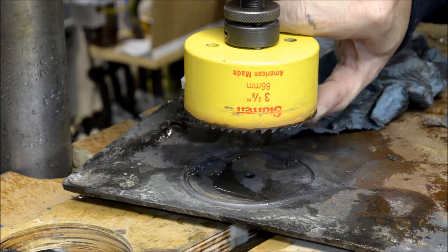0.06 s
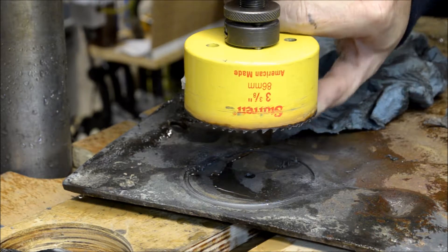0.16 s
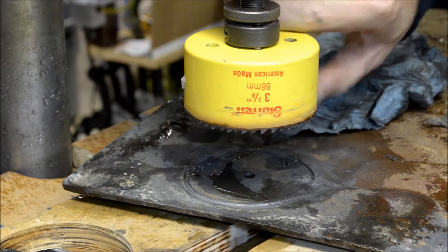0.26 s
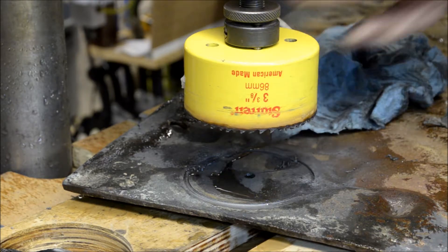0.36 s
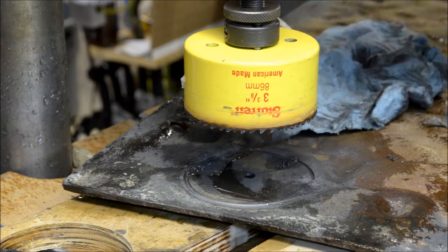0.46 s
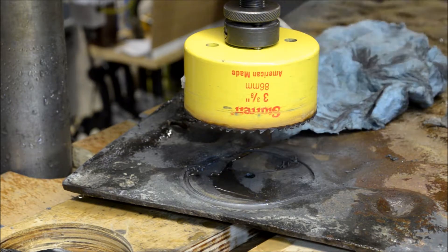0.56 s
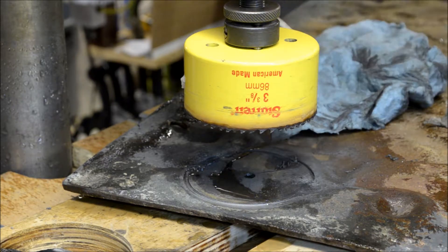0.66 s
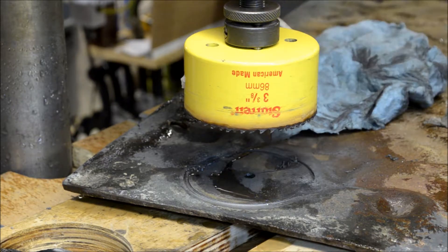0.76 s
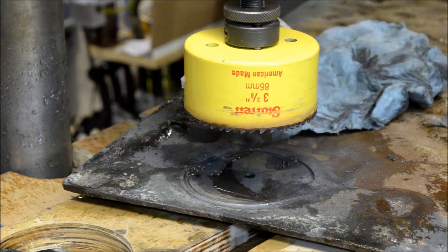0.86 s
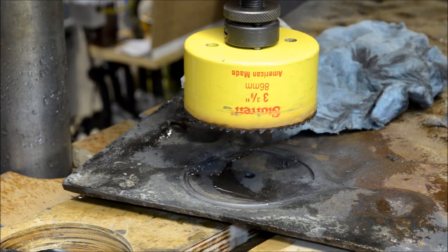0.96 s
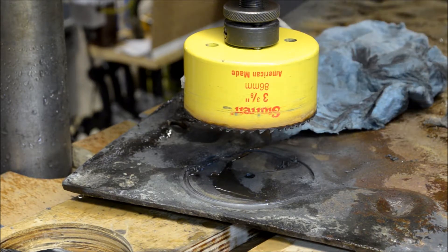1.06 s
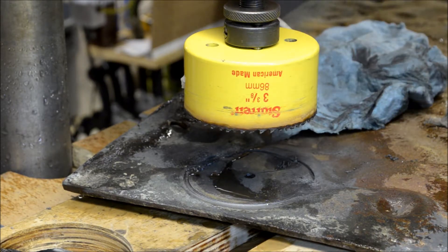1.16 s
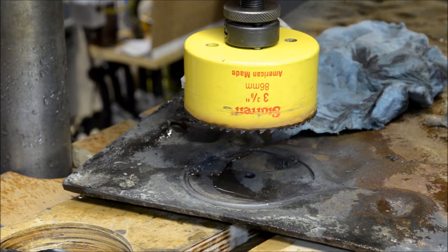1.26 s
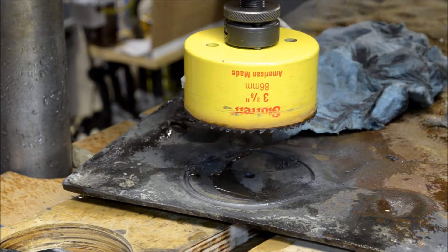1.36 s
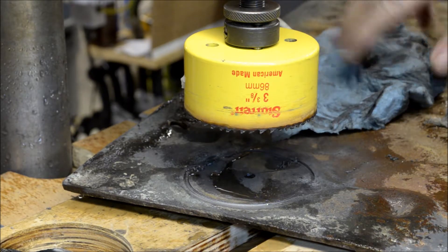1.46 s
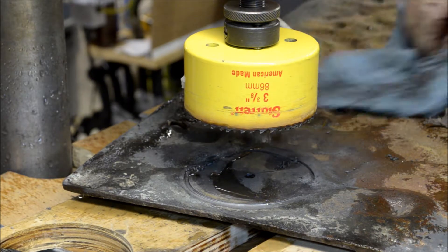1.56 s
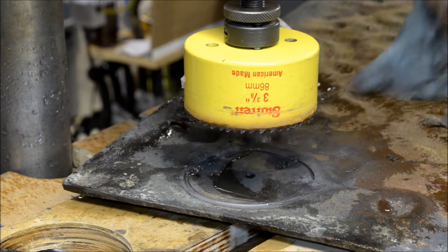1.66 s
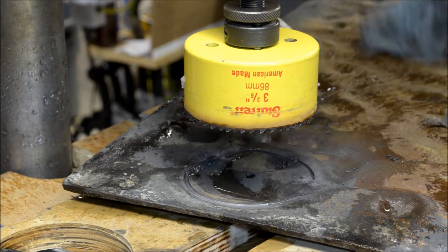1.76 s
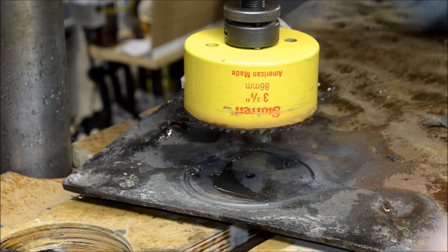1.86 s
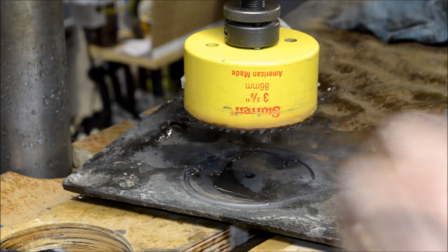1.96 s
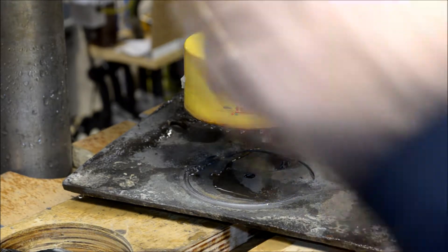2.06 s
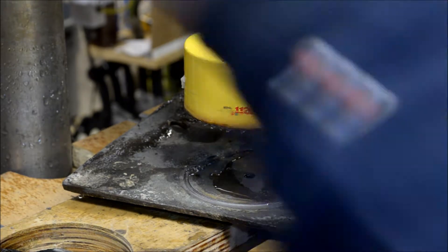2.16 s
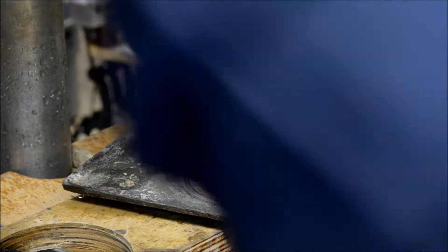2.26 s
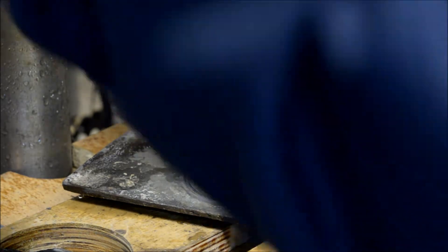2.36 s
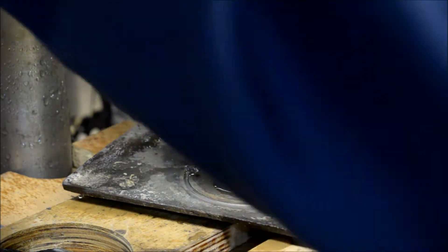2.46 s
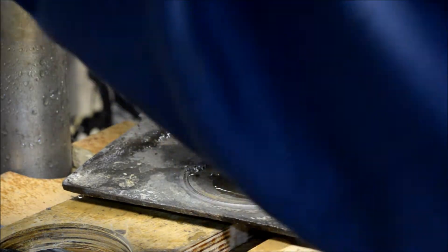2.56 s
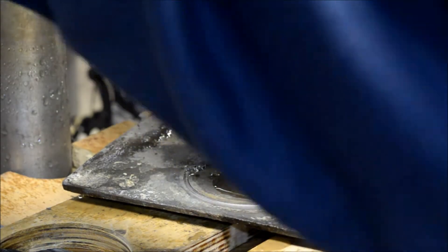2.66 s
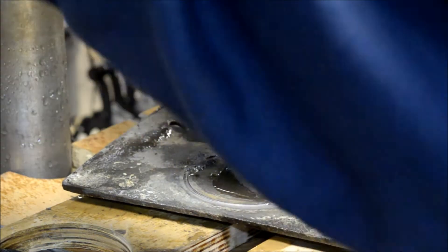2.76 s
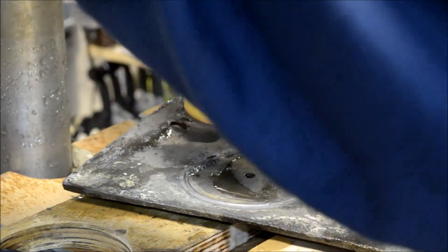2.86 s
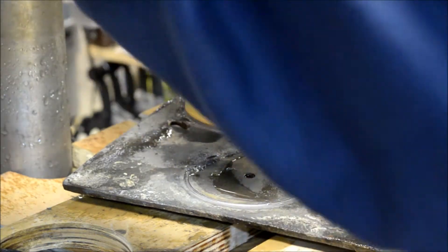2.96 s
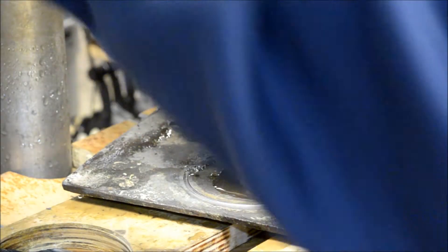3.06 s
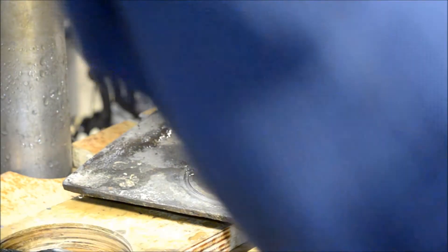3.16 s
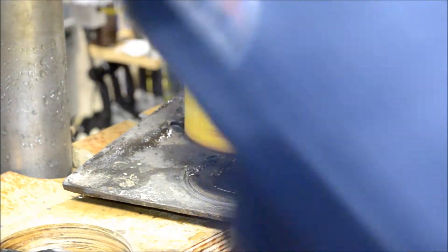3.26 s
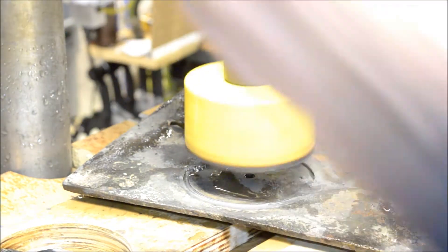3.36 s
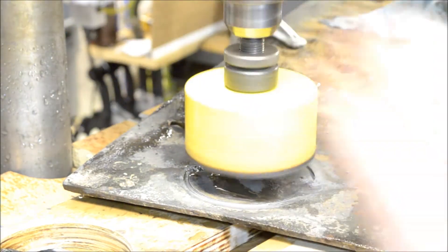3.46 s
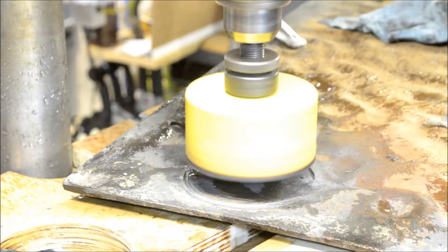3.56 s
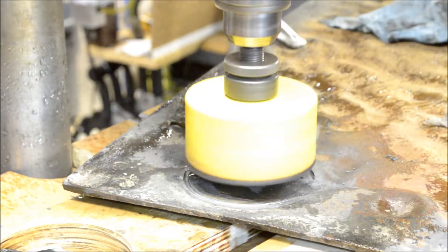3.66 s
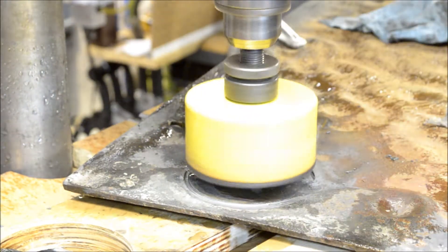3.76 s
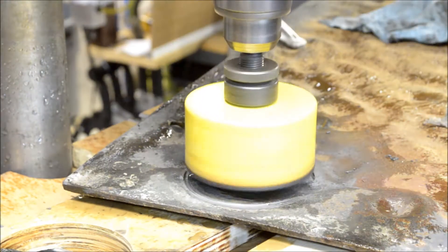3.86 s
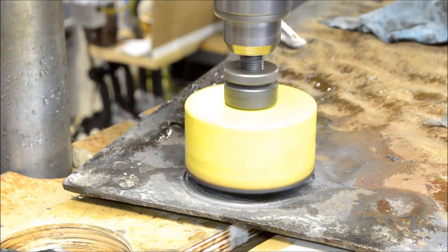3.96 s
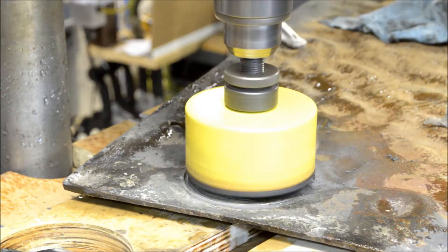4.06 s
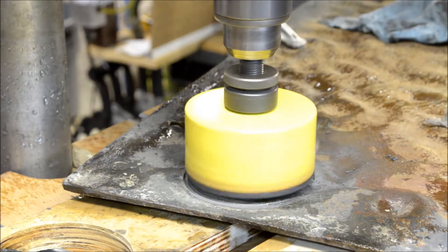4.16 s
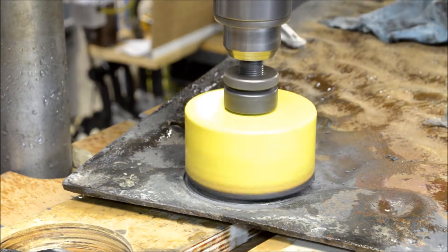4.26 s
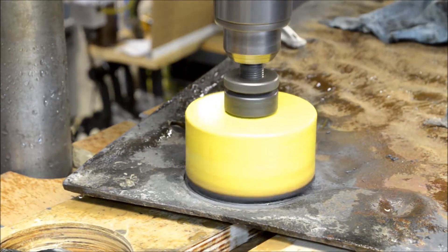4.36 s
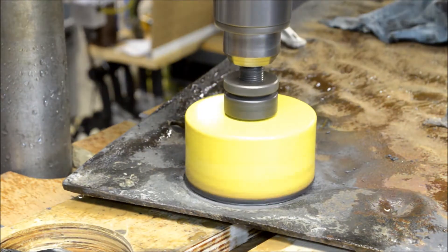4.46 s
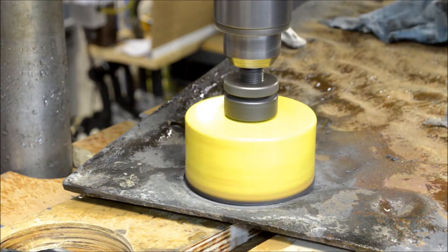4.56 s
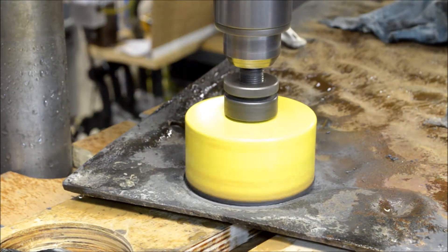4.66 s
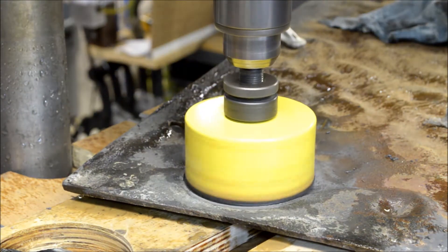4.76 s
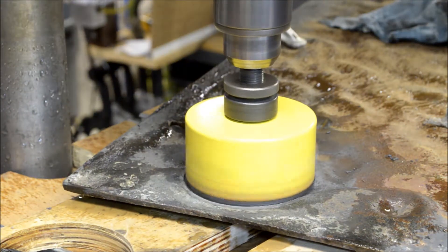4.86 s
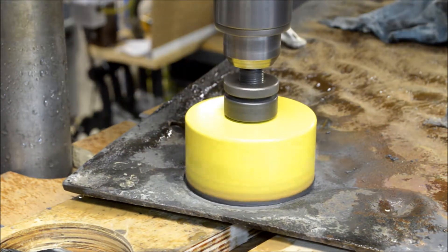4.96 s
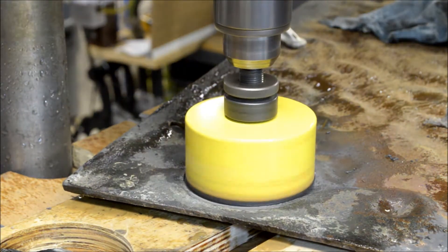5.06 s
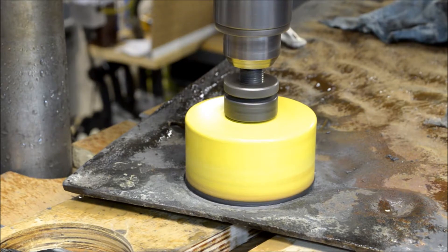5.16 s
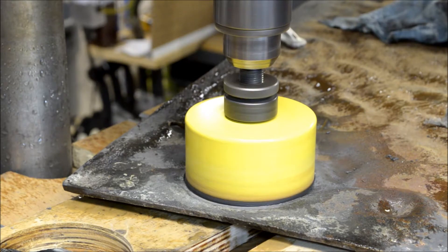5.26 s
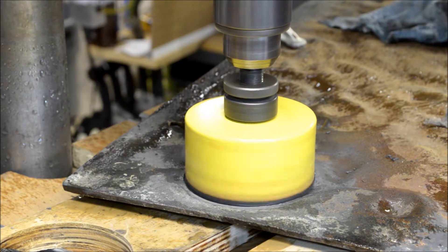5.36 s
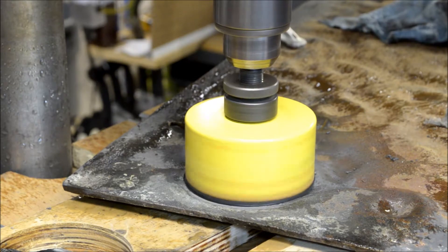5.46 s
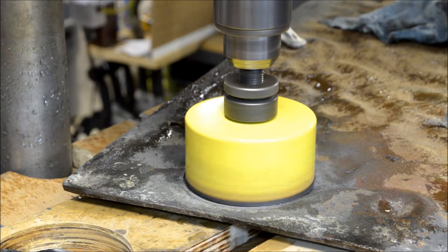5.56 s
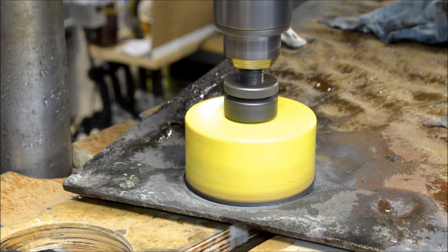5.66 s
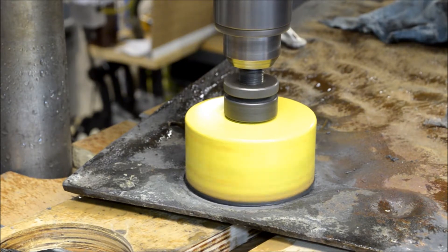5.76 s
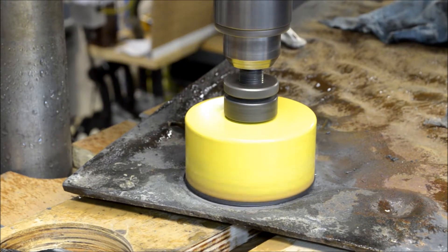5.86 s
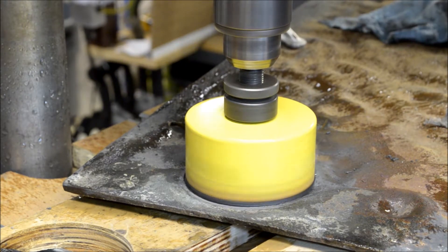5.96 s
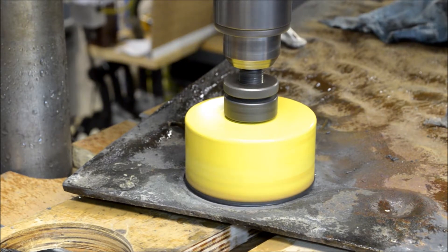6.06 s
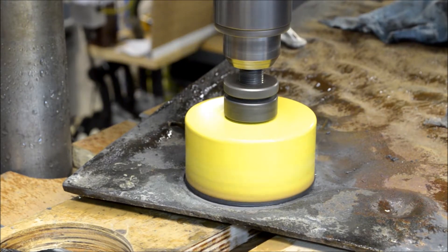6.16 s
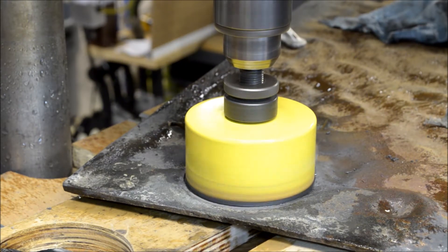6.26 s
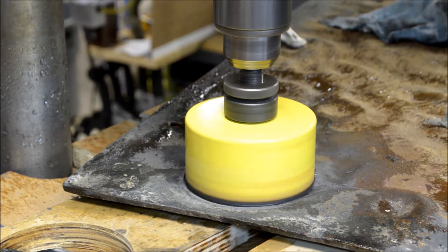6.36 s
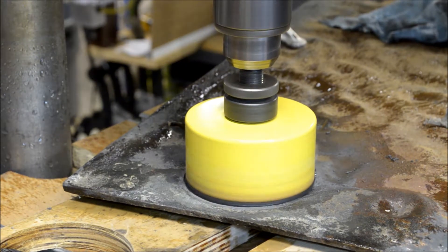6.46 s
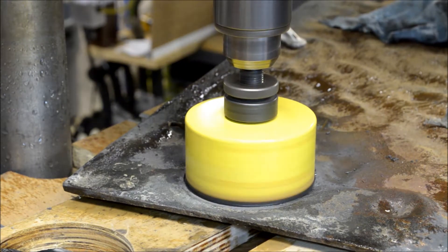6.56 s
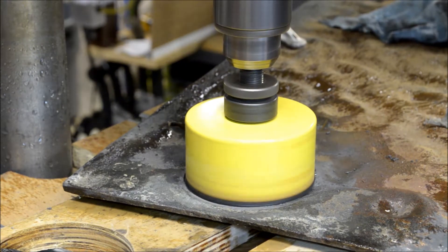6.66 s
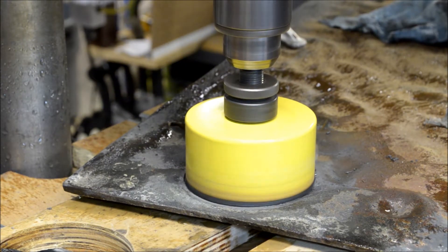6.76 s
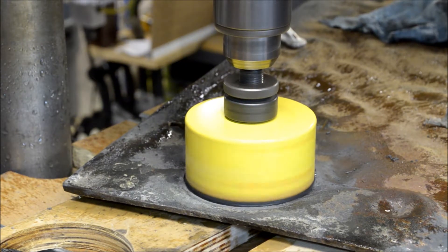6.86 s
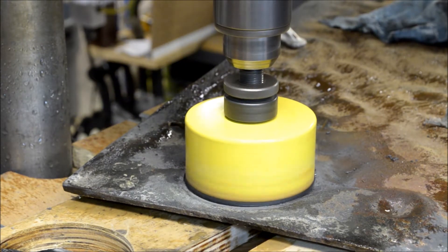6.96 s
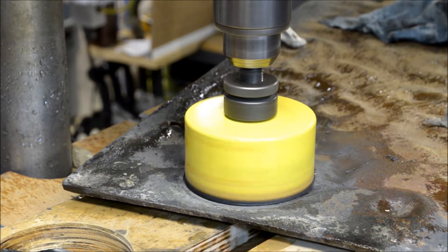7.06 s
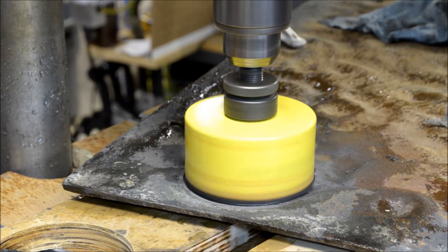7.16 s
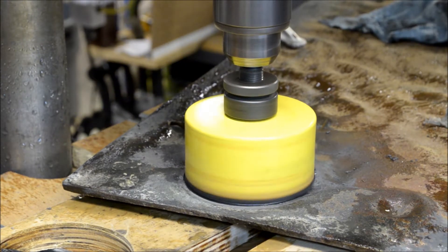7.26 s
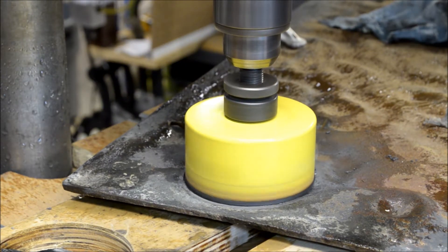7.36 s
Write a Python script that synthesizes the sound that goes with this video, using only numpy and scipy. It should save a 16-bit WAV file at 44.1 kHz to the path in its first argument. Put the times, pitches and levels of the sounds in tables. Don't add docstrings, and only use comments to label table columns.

```python
import sys
import numpy as np
from scipy import signal
from scipy.fft import rfft, irfft
from scipy.io import wavfile
from scipy.ndimage import uniform_filter1d, map_coordinates

SR = 44100
rng = np.random.default_rng(int(sys.argv[2]) if len(sys.argv) > 2 else 0)


def amplitude_ratio(level_db):
    exponent = np.asarray(level_db, float) / 20
    return 10 ** exponent


def transcribe(signal):
    frames = np.atleast_2d(signal).T
    limited = np.clip(frames, -1, 1)
    pcm = np.round(limited * 32767).astype(np.int16)
    wavfile.write(sys.argv[1], SR, pcm)


N = 326340


def unit(x):
    return x / np.sqrt(np.mean(x ** 2) + 1e-20)


def along(points, hz):
    f, v = np.transpose(points)
    return np.interp(np.log(hz + 1), np.log(f + 1), v)


def curves(rows, off=-120):
    s, *cols = np.transpose(rows)
    return [np.interp(np.arange(N) / SR, s, c, left=off) for c in cols]


def wobble(rate):
    return map_coordinates(rng.standard_normal(int(N * rate / SR) + 4), [np.arange(N) * rate / SR])


def below(f, hz, power):
    return 1 / (1 + (f / hz) ** power)


def above(f, hz, power):
    return 1 / (1 + (hz / (f + 1)) ** power)


def bell(f, centre, width):
    return 1 / (1 + (2 * (f - centre) / width) ** 2)


def causal(x, gain, size=16384):
    ceps = irfft(np.log(gain(np.fft.rfftfreq(size, 1 / SR)) + 1e-6), size)
    ceps[1:size // 2] *= 2
    ceps[size // 2 + 1:] = 0
    response = irfft(np.exp(rfft(ceps)), size)
    return signal.fftconvolve(x, response.reshape(np.shape(x)[:-1] + (size,)), axes=-1)[..., :N]


def body(broad, modes=(), broad_db=0):
    def shape(f):
        clear = sum(amplitude_ratio(2 * db) * bell(f, c, w) ** 2 for c, w, db in modes)
        return np.sqrt(amplitude_ratio(2 * (along(broad, f) + broad_db)) + clear)
    norm = np.sqrt(np.mean(shape(np.linspace(0, SR / 2, 8000)) ** 2))
    return lambda f: shape(f) / norm


def bursts(rows, favour=0):
    t, hz, out = np.arange(SR // 2) / SR, np.fft.rfftfreq(SR // 2, 1 / SR), np.zeros(N + SR)
    for s, db, rise, t60, *centre in rows:
        env = amplitude_ratio(db - 60 * np.maximum(t - rise, 0) / max(t60, .005)) * np.clip(t / max(rise, 1e-4), 0, 1)
        c = centre[0] if centre else 1000
        peak = 1 + favour * .2j * hz * c / (c * c - hz * hz + .2j * hz * c)
        noise = env * rng.standard_normal(len(t))
        out[round(s * SR):][:len(t)] += irfft(rfft(noise) * peak, len(t))
    return out[:N]


def strokes(rows):
    t = np.arange(N) / SR
    return sum(amplitude_ratio(db - 20 * np.maximum((s - t) / rise, (t - s) / fall)) for s, db, rise, fall in rows)


def grit(lumps_db, rate):
    return unit(amplitude_ratio(lumps_db * wobble(rate)) * rng.standard_normal(N))


def shifting(x, depth_db, bins, frames):
    z = signal.stft(x, nperseg=512)[2]
    field = uniform_filter1d(uniform_filter1d(rng.standard_normal(z.shape), bins, 0), frames, 1)
    return signal.istft(z * amplitude_ratio(depth_db * unit(field)), nperseg=512)[1][:N]


def snaps(rows):
    t60_at_1khz, damping = .075, 0.35
    out, t = np.zeros(N + SR), np.arange(SR // 8) / SR
    for s, db, hz in rows:
        ring = np.sin(2 * np.pi * hz * t + np.cumsum(rng.normal(0, 0.13, len(t))))
        band = signal.butter(3, [1.7 * hz / SR, 2.2 * hz / SR], 'band')
        crack = 1.6 * signal.lfilter(*band, rng.standard_normal(len(t)))
        fade = amplitude_ratio(db - 1.5 - 60 * t / t60_at_1khz * (hz / 1000) ** damping)
        out[round(s * SR):][:len(t)] += fade * (ring + crack)
    return out[:N]


# (f/Hz, t60/s)
ECHO = [(200, 0.49), (2000, 0.27), (10000, 0.33)]


def shop(x):
    hz, t, z = signal.stft(rng.standard_normal(SR // 2), SR, nperseg=256)
    tail = signal.istft(z * amplitude_ratio(-60 * t / along(ECHO, hz)[:, None]), SR, nperseg=256)[1]
    return signal.fftconvolve(np.pad(x, (300, 0)), tail / np.linalg.norm(tail))[:N]


# (f/Hz, level/dB per Hz)
ROOM_TONE = [(150, -38), (250, -8), (420, 3.5), (570, -1), (1000, -5), (1800, -7), (3300, -12.5),
             (8000, -24), (11000, -25), (15000, -40)]
# (f/Hz, level/dB)
HUMS = [(59.2, -77.5), (527.6, -72.5), (839.8, -84.5), (1798, -82.5)]
# (f/Hz, level/dB per Hz)
RUMBLE_COLOUR = [(12, -40), (25, -14), (45, 0), (87, -3.5), (120, -6), (240, -0.5), (330, -7), (600, -69)]
# (peak t/s, level/dB, 20 dB rise/s, 20 dB fall/s)
RUMBLE_SWELL = [
    (1.05, -75.5, 1.2, 2),
]


def room_tone():
    t = np.arange(N) / SR
    hum = sum(1.4 * amplitude_ratio(db + .8 * wobble(6)) * np.sin(2 * np.pi * hz * t + .4 * wobble(5)) for hz, db in HUMS)
    rumble = (amplitude_ratio(-75) + strokes(RUMBLE_SWELL)) * causal(rng.standard_normal(N), body(RUMBLE_COLOUR))
    air = amplitude_ratio(-69 + 1.2 * wobble(2.6)) * causal(rng.standard_normal(N), body(ROOM_TONE))
    return hum + rumble + air


# (t/s, f/Hz)
SQUEAK = [
    (.78, 4930),
    (.84, 4550),
    (.87, 4050),
    (.95, 3950),
]
# (peak t/s, level/dB, 20 dB rise/s, 20 dB fall/s)
SQUEAK_SWELLS = [
    (.8, -75, .12, .1),
    (.875, -56, .03, .09),
]


def squeak():
    hz, = curves(SQUEAK, off=SQUEAK[0][1])
    tone = np.sin(2 * np.pi * np.cumsum(hz + 150 * wobble(400)) / SR)
    return strokes(SQUEAK_SWELLS) * amplitude_ratio(3 * wobble(150)) * tone


# (peak t/s, level/dB, 20 dB rise/s, 20 dB fall/s)
CLOTH = [
    (.71, -61.5, .25, .3),
    (.87, -49, .03, 0.09),
    (1.6, -65.5, .16, 0.15),
    (2.46, -66, 1.5, .3),
    (2.7, -60.5, 0.3, 0.2),
]
# (f/Hz, level/dB per Hz)
WEAVE = [(500, -25), (900, -5), (2600, -7), (4000, -8.5), (5700, -11.5), (7900, -12), (10500, -19.5),
         (13000, -38), (15000, -55)]


def cloth():
    ruffles = [(s, db - 40, .015, 0.1) for s, db, thud, hz in KNOCKS]
    return strokes(CLOTH + ruffles) * causal(grit(lumps_db=1.5, rate=370), body(WEAVE))


# (t/s, level/dB, f/Hz)
TICKS = [(0.257, -66, 9200), (0.257, -59, 5000), (1.345, -72, 3380), (1.7469, -57, 8090),
         (1.8023, -62, 7410), (1.84, -59, 8000), (2.49, -47, 2600), (2.517, -47, 3500), (2.519, -50, 4600),
         (2.525, -50, 2500), (2.62, -58, 2450), (2.635, -57, 2400), (2.65, -56, 2450), (2.655, -58, 900)]


def fibres():
    return snaps(TICKS)


# (t/s, level/dB, thud level/dB, favoured f/Hz)
KNOCKS = [(0.139, -39.5, -17, 755), (0.256, -35, -13, 1060), (0.475, -55, -19, 2160),
          (0.835, -38.5, -11, 1230), (1.013, -35, -12, 1340), (1.043, -31, -9, 850), (1.17, -31.5, -9, 780),
          (1.234, -37, -4.5, 1310), (1.252, -37, -4, 853), (1.345, -33.5, -10, 865),
          (2.489, -29.5, -19.5, 1310), (2.516, -29, -10, 840)]
# (f/Hz, width/Hz, level/dB)
BENCH = [(400, 50, -3), (458, 35, 0), (786, 50, 3), (915, 45, -3), (1015, 25, -4), (1195, 40, -6),
         (1314, 50, -1), (1421, 30, -7), (1640, 35, -8), (1739, 35, -8), (2099, 40, -10), (2320, 45, -11),
         (3560, 80, -20)]
# (f/Hz, level/dB per Hz)
BENCH_BROAD = [(71, -65), (120, -33), (390, 0), (498, 0.5), (856, 0), (3550, -21), (6000, -33), (7800, -68),
               (13200, -120)]
# (t/s, level/dB, rise/s, t60/s)
SCUFF = [
    (.862, -53, 0.016, .16),
]
# (t/s, level/dB, rise/s, t60/s, f/Hz)
CREAK = [
    (3.2, -46, .06, 0.22, 2400),
    (2.8, -58, .03, .3, 1400),
    (3.1, -44, .03, .25, 470),
    (0.74, -53, 0.0092, 0.25, 1400),
]


def bench():
    timber = body(BENCH_BROAD, BENCH, broad_db=-5.5)
    knocks = bursts([(s, db - 6.5, .0008, 0.115, hz) for s, db, thud, hz in KNOCKS], favour=0.98)
    wood = causal(knocks, lambda f: timber(f) * above(f, 600, 6))
    thuds = bursts([(s, db + thud, .004, 0.26) for s, db, thud, hz in KNOCKS])
    thuds = causal(thuds, lambda f: timber(f) * below(f, 600, 6))
    hard = [(1200, -26), (2400, 11), (2900, -12), (3500, 3), (4800, -12), (9000, -49)]
    edge = causal(bursts([(s, db - 27, .001, 0.12) for s, db, thud, hz in KNOCKS]), body(hard))
    boards = [(60, -36), (150, 5), (260, 3), (600, -40)]
    creak = causal(bursts(CREAK, favour=17) / 7, lambda f: below(f, 3500, 4))
    return creak + wood + thuds + edge + causal(bursts(SCUFF), body(boards))


# (t/s, level/dB, f/Hz)
SWITCH = [(2.82, -54, 3250), (2.821, -55, 9000), (2.821, -52, 10000), (2.821, -55, 5200),
          (2.8497, -21, 3590), (2.85, -26, 10000), (2.85, -29, 8300), (2.85, -31, 6300), (2.854, -27, 7600),
          (2.855, -28, 10300), (2.869, -15.5, 1340), (2.874, -20, 1100), (2.8699, -26, 6510),
          (2.902, -32, 9100), (2.995, -32, 6500), (2.995, -41, 11000), (3.007, -24, 7350),
          (3.007, -36, 11500), (3.031, -38, 11500)]


def switch():
    return snaps(SWITCH)


def strain():
    t = np.arange(N) / SR
    start_s, attack_s, release_s = 2.872, 0.009, 0.055
    held = amplitude_ratio(-20 * np.maximum(0, np.maximum((start_s - t) / attack_s, (t - UP_S) / release_s)))
    throat = [(300, -46), (620, -8), (790, 9), (900, -4), (1200, -35), (2000, -60)]
    growl = causal(grit(lumps_db=-3.5, rate=130), body(throat))
    growl = strokes([(start_s + 0.071, -28, .05, .16)]) * growl
    hum = np.sin(2 * np.pi * np.cumsum(246 + 3.4 * wobble(20)) / SR)
    return held * (amplitude_ratio(-24.5 + 1.9 * wobble(24.7)) * hum + growl)


def ducking():
    return np.minimum(uniform_filter1d(curves(MOTOR, off=RUN_DB)[0], SR // 8) - RUN_DB, 0)


RUN_DB, UP_S = -34, 3.03
# (t/s, level/dB)
MOTOR = [(2.852, -45), (2.875, -26.5), (2.94, -24.5), (3.055, -24), (3.09, -33.5), (3.74, -34.5),
         (3.79, -29.5), (4.42, -32), (4.62, -31), (4.81, -35.5), (4.87, -47), (7.15, -42), (7.3, -30),
         (7.4, -34)]
# (f/Hz, width/Hz, level/dB)
CASING = [(249, 25, -3), (394, 40, -2), (445, 42, -2), (824, 180, -3), (1310, 86, -5.5), (1740, 23, -7.5),
          (2237, 55, -10.5), (3200, 200, -13.5), (5200, 200, -20), (6400, 250, -20), (9000, 400, -25.5)]
# (f/Hz, level/dB per Hz)
CASING_BROAD = [(150, -60), (215, -30), (240, 2), (310, -13.5), (420, -7.5), (850, -4), (3200, -15),
                (6400, -20), (9000, -27.5), (12000, -42.5), (15000, -58)]
# (multiple, level under casing/dB)
SHAFT = [(8, -19), (11, -9.5), (12, -13), (13, -4), (15, -17), (16, -21), (20, -17), (26, -18)]
# (peak t/s, level/dB, 20 dB rise/s, 20 dB fall/s)
JOLT = [
    (2.87, -22, 0.016, 0.0646),
    (3.015, -33.5, 0.0629, 0.03),
]


def motor():
    t = np.arange(N) / SR
    level_db, = curves(MOTOR)
    running = level_db > -99
    casing_db = level_db + .7 * wobble(14)
    whir = amplitude_ratio(-31.5 + 0.76 * (level_db - RUN_DB) + 0.3 * wobble(20)) * running + strokes(JOLT)
    turns = np.cumsum(29.89 * (1 + 0.0027 * wobble(3.3))) / SR
    orders = sum(amplitude_ratio(db - 2 + 1.8 * wobble(11)) * np.sin(2 * np.pi * k * turns + 6 * k) for k, db in SHAFT)
    rattle = causal(grit(lumps_db=1.2, rate=90), body(CASING_BROAD, CASING, broad_db=-2))
    low = causal(rattle, lambda f: below(f, 700, 4))
    run_up_db = -20 * np.clip((UP_S - t) / .4, 0, 1)
    kick_db = 6 * np.exp(-((t - UP_S) / .06) ** 2)
    column_db = -61 + run_up_db + kick_db + 1.04 * ducking() + 2.1 * wobble(10)
    column_gain = uniform_filter1d(amplitude_ratio(np.where(running, column_db, -120)), SR // 10)
    iron = [(20, -60), (45, -33), (65, -12), (92, -8), (120, 6.5), (170, -6), (230, -34), (400, -59)]
    column = column_gain * causal(rng.standard_normal(N), body(iron))
    return amplitude_ratio(casing_db) * (orders + 0.78 * unit(low)) + whir * unit(rattle - low) + column


# (t/s, level/dB, favoured f/Hz)
PILOT = [
    (3.77, -8, 1450),
    (3.782, -7, 1450),
    (3.846, -13, 2300),
    (3.868, -8, 3150),
    (3.908, -20, 9000),
    (3.93, -16, 2310),
    (3.945, -13, 1900),
    (4.025, -15.5, 2360),
    (4.045, -18, 2000),
]
# (f/Hz, width/Hz, level/dB)
PILOT_MODES = [(844, 69, -5), (1340, 85, -11), (1810, 48, 5), (2400, 400, -1.5), (2760, 120, 0),
               (3170, 110, 0), (4400, 54, -14), (4840, 280, -3), (6350, 98, -6), (9000, 640, -7),
               (14100, 350, -29)]
# (f/Hz, level/dB per Hz)
PILOT_BROAD = [(240, -27), (400, 10.5), (577, -4), (1190, 0), (1540, -4), (3160, -9), (5650, -11),
               (9070, -17), (10600, -32), (14400, -43), (15500, -57)]
# (t/s, level/dB)
BRUSH = [
    (4.139, -36),
    (4.2344, -37),
    (4.3152, -30),
    (4.3898, -36),
    (4.48, -29.5),
    (4.56, -24.5),
    (4.63, -25),
    (4.69, -30),
]
# (f/Hz, level/dB per Hz)
TABLE = [(200, -39), (300, -14), (440, -1), (640, -9.5), (880, -2.5), (1250, -9), (2500, -48), (8000, -120)]
# (peak t/s, level/dB, 20 dB rise/s, 20 dB fall/s)
WHINE = [
    (3.31, -45, 0.1, .12),
    (3.71, -41, .04, .1),
]


def pilot():
    rise_s, t60_s = 0.01, 0.095
    dull = body(PILOT_BROAD, PILOT_MODES, broad_db=0.5)
    rough = amplitude_ratio(1.9 * wobble(200))
    rub = rough * bursts([(s, db - 10.3, rise_s, t60_s, hz) for s, db, hz in PILOT], favour=1.6)
    rub = causal(rub, lambda f: dull(f) * below(f, 5700, 8) * above(f, 500, 4))
    fine = bursts([(s, db - 10.5, rise_s, t60_s) for s, db, hz in PILOT])
    fine = causal(fine, lambda f: dull(f) * above(f, 5700, 8))
    table = causal(bursts([(s, db, rise_s, 1.9 * t60_s) for s, db in BRUSH]), body(TABLE))
    whine = causal(rng.standard_normal(N), lambda f: bell(f, 3220, 150), size=4096)
    return rub + fine + table + strokes(WHINE) * unit(whine)


# (t/s, surge level/dB)
TURNS = [(4.722, 2), (4.808, 4), (4.895, 5), (4.987, 5), (5.072, 6), (5.16, 5), (5.254, 6), (5.343, 5),
         (5.434, 6), (5.522, 6), (5.617, 5), (5.708, 4), (5.795, 5), (5.89, 4), (5.993, 5), (6.09, 4.5),
         (6.192, 4), (6.286, 3), (6.385, 2), (6.457, 2), (6.544, 2), (6.605, 1.5), (6.688, 3), (6.76, 1.5),
         (6.872, 3), (6.96, 3), (7.054, 2), (7.15, 0)]


def surge():
    s, db = np.transpose(TURNS)
    turns = np.interp(np.arange(N) / SR, s, np.arange(len(s)))
    u, dig = turns % 1, .14
    shape = np.where(u < dig, u / dig, 1 - np.abs((u - dig) / (1 - dig)) ** 1.25) - .6
    return uniform_filter1d(db[turns.astype(int)] * shape * (turns > 0), SR // 200)


def chatter():
    chance, size = rng.random(N), rng.standard_normal((2, N))
    return amplitude_ratio(-6) * unit((chance < 600 / SR) * np.sign(size[0]) * amplitude_ratio(3.5 * size[1]))


# (t/s, level/dB)
CUT = [(4.535, -47), (4.574, -24), (4.676, -22), (4.69, -17), (4.82, -19), (6.25, -19.3), (6.5, -19),
       (7.01, -18.7), (7.05, -21.5), (7.154, -27.5), (7.2, -39), (7.24, -49), (7.374, -44), (7.385, -27),
       (7.4, -18)]
# (f/Hz, width/Hz, level/dB)
PLATE = [(1355, 60, -7), (1552, 25, -8), (1743, 18, -4), (1792, 25, -5), (2105, 35, -4), (2328, 34, 2.5),
         (2613, 45, 3), (2670, 30, 1), (2798, 28, 4), (2440, 130, -4), (3020, 35, -2), (3315, 40, -3),
         (3486, 30, -4), (3597, 35, -5), (4506, 30, -5), (4870, 40, -7), (5060, 55, -9)]
# (f/Hz, level/dB per Hz)
PLATE_BROAD = [(260, -32), (450, -16.5), (599, -18), (860, -16.5), (1000, -18), (1300, -9.5), (2000, -7),
               (2720, -2.5), (3830, -8), (4980, -8), (5740, -17.5), (6200, -14.5), (8060, -26.5),
               (13600, -120)]
# (t/s, level/dB, rise/s, t60/s, favoured f/Hz)
BITE = [
    (4.683, -11, 0.0013, 0.08, 3450),
    (4.574, -17, .002, .1, 1900),
    (4.597, -18, .004, .1, 2000),
    (4.632, -17, .003, .08, 1800),
    (4.724, -15, .003, .09, 3450),
]
# (t/s, level/dB, favoured f/Hz)
TEETH = [(4.4675, -15, 6140), (4.478, -15, 6160), (4.489, -15, 8270), (4.499, -14, 8270),
         (4.508, -17, 8270), (4.517, -17, 6160), (4.549, -19.5, 8270), (4.56, -19, 6140),
         (4.574, -17, 6140), (4.587, -18, 8270), (4.608, -18, 10500), (4.631, -14, 8340),
         (4.645, -18, 10500), (4.66, -19, 8270), (4.673, -19, 6300), (4.685, -19, 8280), (4.723, -15, 8280),
         (4.738, -18, 8280), (4.752, -19, 6200), (7.118, -20, 8280), (7.2557, -16, 8240),
         (7.262, -14, 8280), (7.27, -18, 4500), (7.2842, -17, 8250), (7.378, -16.5, 8250)]
# (f/Hz, width/Hz, level/dB)
CUP = [(870, 100, -2), (1230, 240, 2.5), (1950, 190, -1.5), (2750, 60, 2), (2800, 23, -52), (3170, 82, -2),
       (4290, 120, -1), (4660, 120, -1), (6160, 110, 2), (8070, 80, 0), (8290, 200, 4.5), (10600, 900, -7),
       (13000, 2000, -20)]
# (f/Hz, level/dB per Hz)
CUP_BROAD = [(290, -8.5), (500, -5), (1250, -1), (1490, -6), (4450, -3.5), (5520, -9), (6020, 4.5),
             (7460, -27), (8250, -6), (15500, -20)]
# (f/Hz, level/dB per Hz)
CHIPS = [(3060, -39.5), (5200, -1.5), (5750, -4.5), (6510, -2), (8810, -4.5), (9830, -14), (11100, -13),
         (14200, -31.5), (15500, -33)]
# (t/s, level/dB)
NICKS = [
    (7.147, -30),
    (7.195, -31),
    (7.235, -25),
    (7.321, -28),
    (7.347, -27),
    (7.367, -20.5),
]


def saw():
    (plate_db,), swell = curves(CUT), surge()
    late, early = np.roll(swell, round(.003 * SR)), np.roll(swell, -round(.008 * SR))
    iron = body(PLATE_BROAD, PLATE, broad_db=-1.0)

    def loudest(f):
        return below(f - 2700, 560, 4)

    tear = amplitude_ratio(plate_db + 1.25 * late) * unit(grit(lumps_db=1.2, rate=200) + chatter())
    tear = shifting(tear + bursts(BITE, favour=0.56), depth_db=1.6, bins=3, frames=6)
    roar = amplitude_ratio(plate_db + .4 + 1.45 * early) * unit(grit(lumps_db=1.1, rate=150) + chatter())
    roar = shifting(roar, depth_db=0.5, bins=3, frames=8)
    plate = causal(tear, lambda f: iron(f) * np.sqrt(1 - loudest(f)))
    plate += causal(roar, lambda f: iron(f) * np.sqrt(loudest(f)))

    rise_s = 0.004
    hiss = amplitude_ratio(plate_db - 13 + 1.1 * late) * grit(lumps_db=0.15, rate=220)
    hiss += bursts([(s, db - 17, rise_s, .09) for s, db, hz in TEETH])
    chips = causal(shifting(hiss, depth_db=1.84, bins=4, frames=8), body(CHIPS))
    nicks = bursts([(s, db, .0005, 0.028) for s, db in NICKS])
    chips += causal(nicks, lambda f: above(f, 9000, 6) * below(f, 12500, 8), size=1024)

    catches = bursts([(s, db - 8.0, rise_s, 0.085, hz) for s, db, hz in TEETH], favour=0.36)
    cup = causal(nicks + catches, body(CUP_BROAD, CUP, broad_db=-6))
    return plate + chips + cup


def scene():
    far = bench() + fibres() + switch() + squeak()
    near = causal(pilot() + saw() + strain(), lambda f: above(f, 190, 6)) + motor()
    echo = shop(amplitude_ratio(-7.5) * far + amplitude_ratio(-10.5) * near)
    return (far + near + echo + cloth() + amplitude_ratio(1.7 * ducking()) * room_tone())[None]


def roll_off(x):
    return signal.sosfilt(signal.butter(12, 15690, fs=SR, output="sos"), x)


# (f/Hz, width/Hz, depth 0-1)
PORT = [(5710, 350, 0.68), (6950, 110, 0.55), (14900, 200, .7)]


def record(dry):
    x = dry / (1 + np.abs(dry / 0.6) ** 4) ** (1 / 4)

    def microphone(f):
        notches = np.prod([1 - depth * bell(f, c, w) for c, w, depth in PORT], axis=0)
        return notches * below(f, 15650, 100)

    return roll_off(causal(x, microphone))


dry = scene()
out = record(dry)
transcribe(out)
```